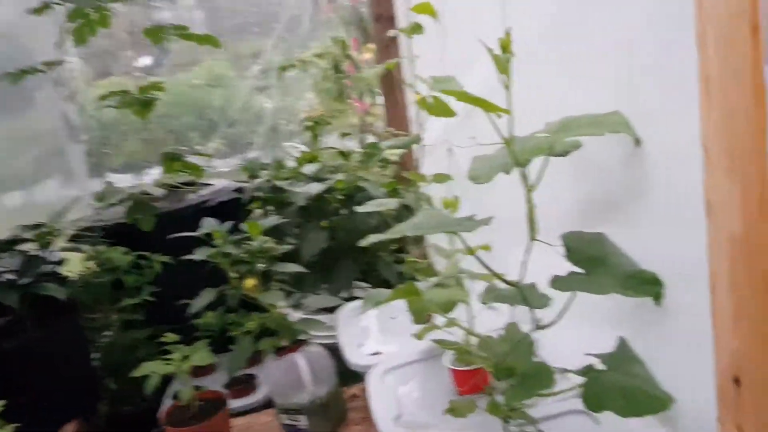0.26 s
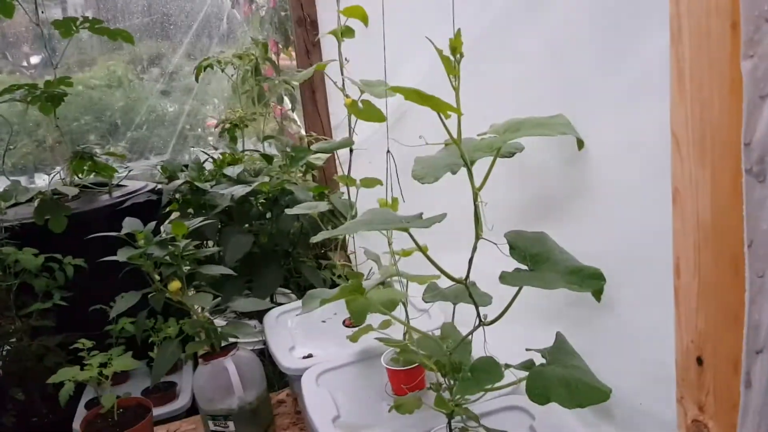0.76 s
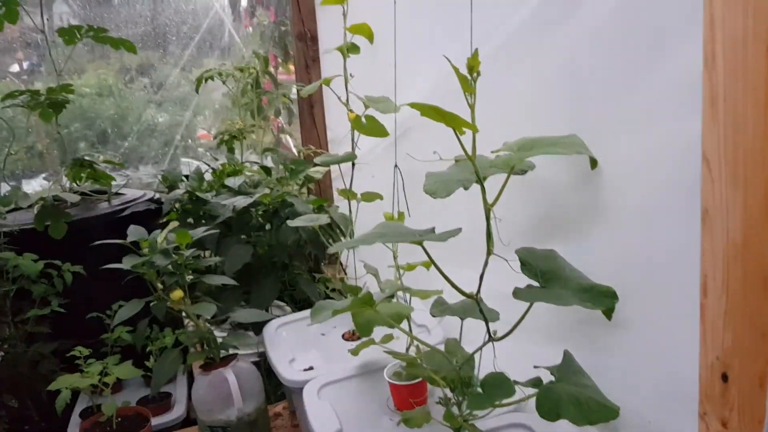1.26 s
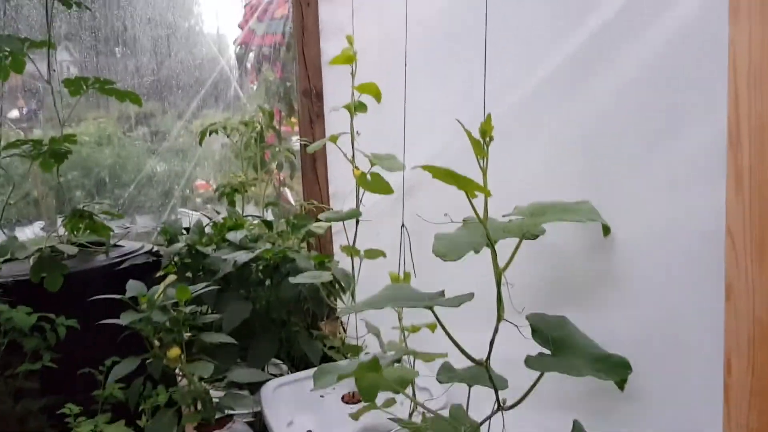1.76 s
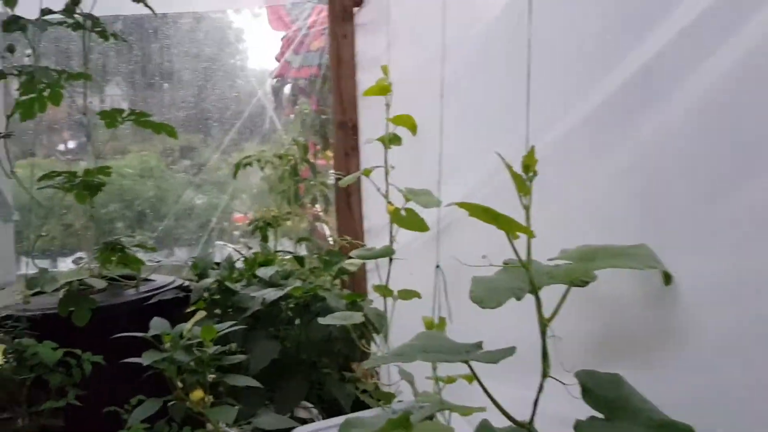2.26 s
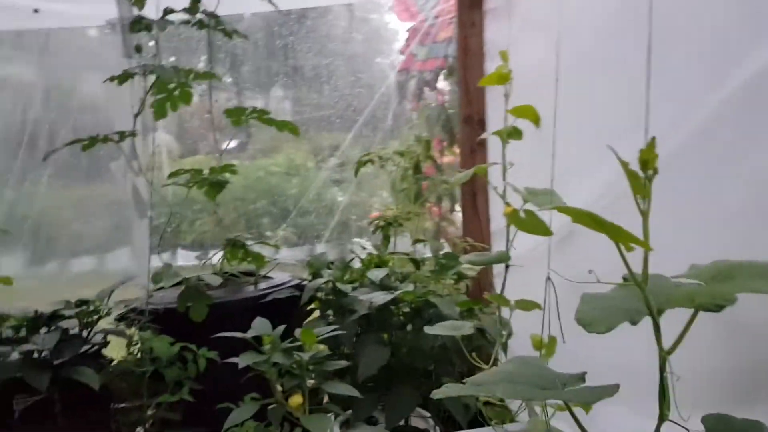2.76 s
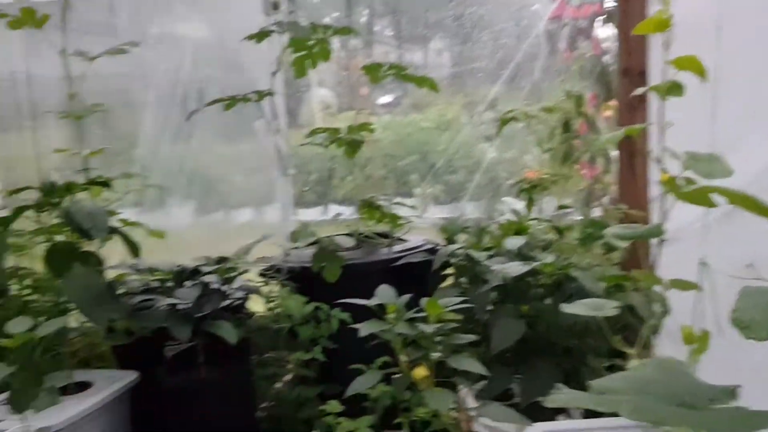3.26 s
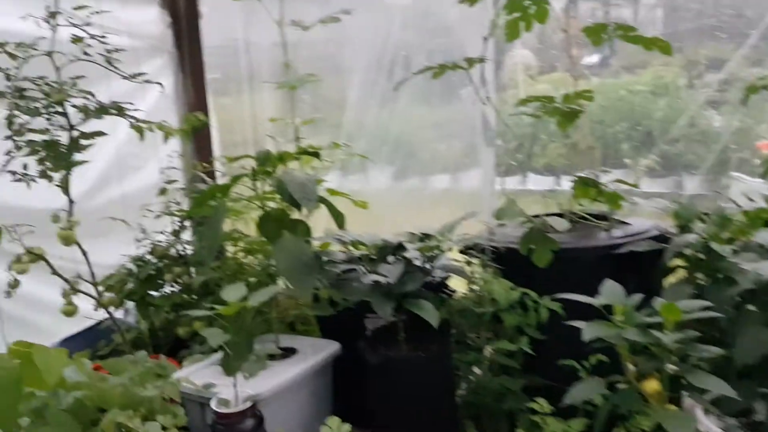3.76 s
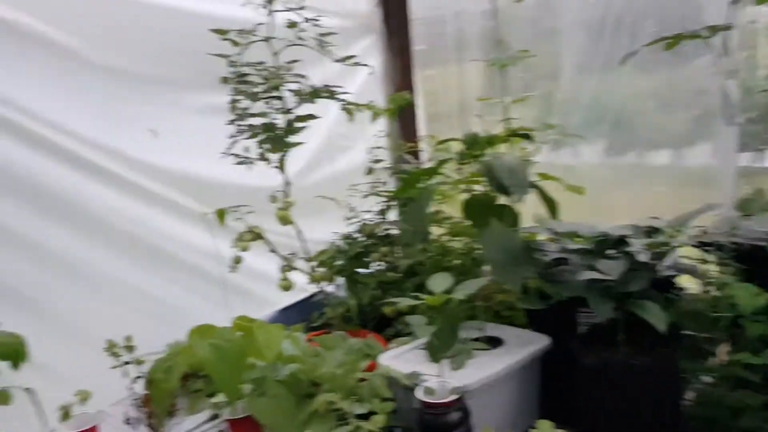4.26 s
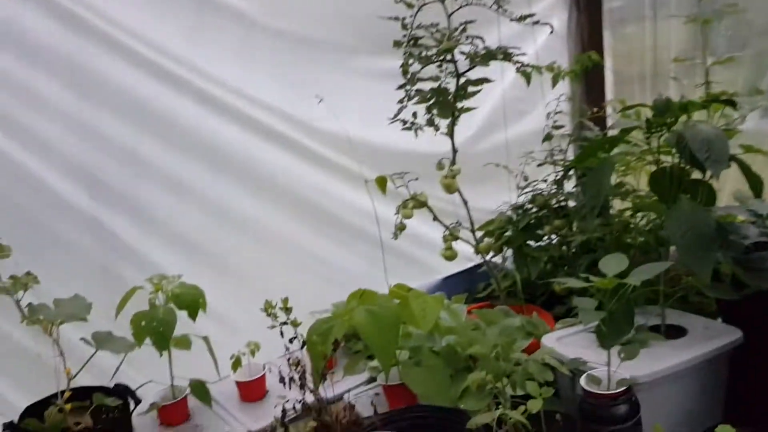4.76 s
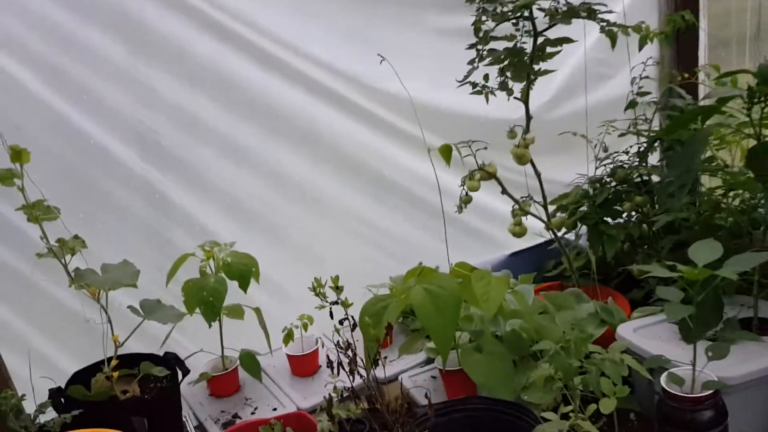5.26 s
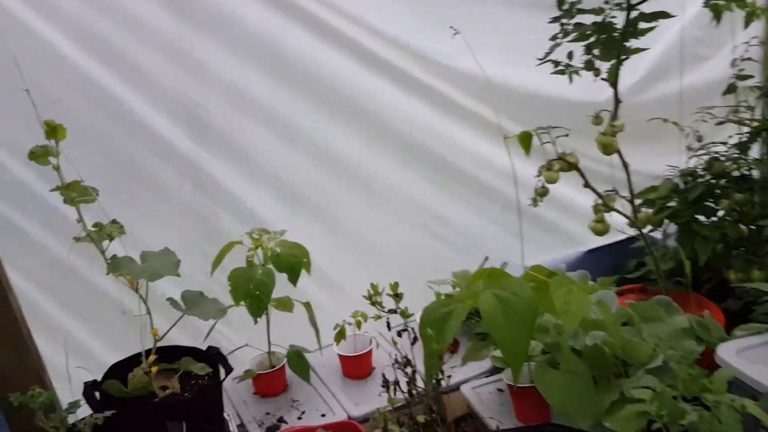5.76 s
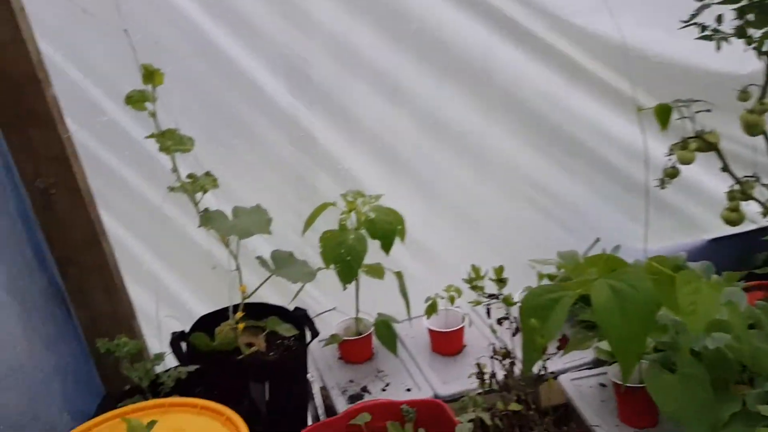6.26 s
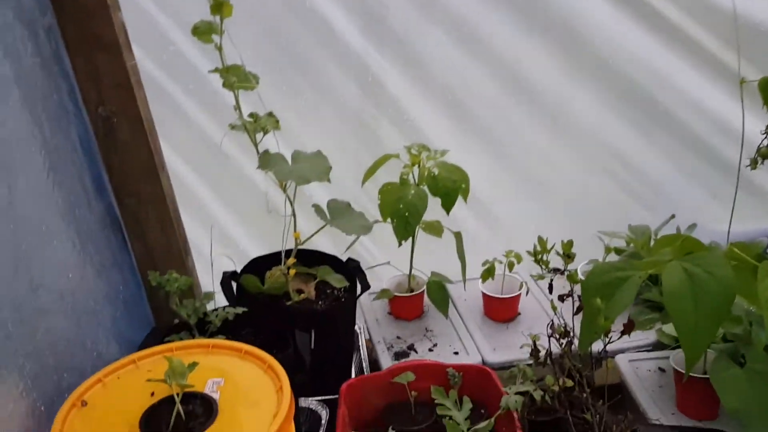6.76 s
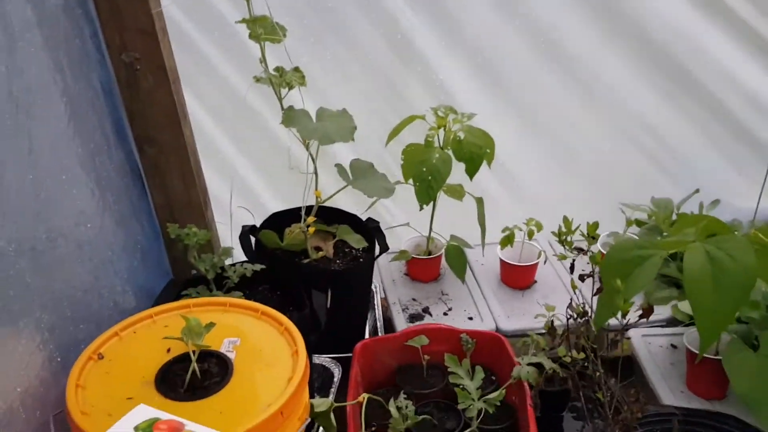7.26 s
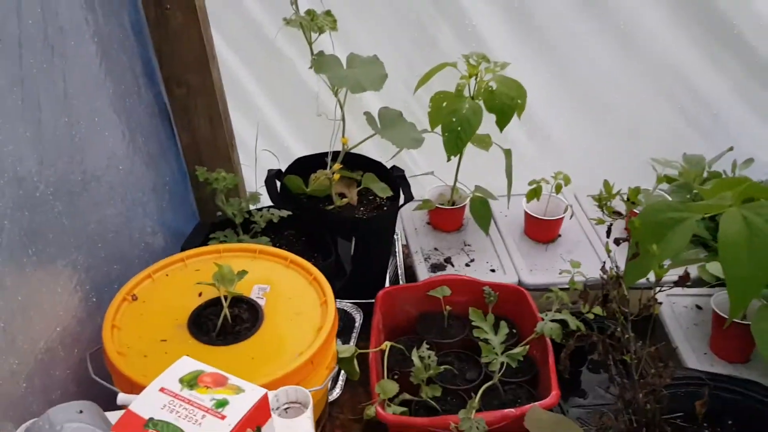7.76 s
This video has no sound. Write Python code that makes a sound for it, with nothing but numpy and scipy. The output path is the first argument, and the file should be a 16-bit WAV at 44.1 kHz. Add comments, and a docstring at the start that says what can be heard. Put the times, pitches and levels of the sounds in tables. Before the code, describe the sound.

For all eight seconds, fine rain hisses and patters on a small plastic greenhouse, heard from inside and slightly to the left, over a steady low outdoor rumble. Heavier drops snap irregularly on the sheeting, several a second, each ringing a panel at a different pitch and leaving a short grainy tail. Clear ones land at about 0.2, 1.4 and 2.1 seconds. The strongest fall between 3.5 and 4.1, with others near 5.4, 5.9 and 7.3.

From about 2.8 to 3.6 seconds the rain changes tone as the hand-held camera turns toward another wall. A sharp handling bump hits the microphone on the left at 2.9. From 3.1 to 4 seconds a finger creaks over the casing on the right in two strokes. Small close bumps follow on the right around 4.1 and 6.3, then cluster between 7.2 and 7.9 while the rain continues.

```python
"""Fine rain hisses on a small plastic greenhouse, heard from inside over a low outdoor rumble.
Heavy drops snap on the sheeting: a panel rings and the enclosure answers with a short grainy tail.
The rain changes colour as a hand-held camera turns left, from one wall to another.
A finger creaks in slips over the casing by the right microphone port and now and then bumps a port."""
import sys
import numpy as np
from scipy import signal
from scipy.fft import rfft, irfft, next_fast_len
from scipy.io import wavfile
from scipy.ndimage import uniform_filter1d, map_coordinates

SR = 44100
rng = np.random.default_rng(int(sys.argv[2]) if len(sys.argv) > 2 else 0)


def generate_wav(signal):
    """Clip the signal to [-1, 1] and save it as 16-bit WAV at the path in sys.argv[1]."""
    frames = np.transpose(np.atleast_2d(signal))
    scaled = np.clip(frames, -1, 1) * 32767
    pcm = np.round(scaled).astype(np.int16)
    wavfile.write(sys.argv[1], SR, pcm)


N = 352894

# Port balance facing the second wall. Each row: frequency in Hz, left over right in dB.
SECOND_WALL_BALANCE = [(60, 1.5), (110, 12), (200, 3), (380, 3), (700, 5.5), (1290, 3), (2380, 1),
                       (4400, 10), (8120, 8), (15000, -15.5)]
DROP_PAN_DB = np.array([[2.25], [-2.25]])  # drops are louder at the left port


def amp(db):
    return 10 ** (np.asarray(db) / 20)


def unit(x):
    return x / np.sqrt(np.mean(x ** 2) + 1e-20)


def along(points, hz):
    """Interpolate (Hz, value) points on a log axis."""
    knots_hz, values = np.transpose(points)
    return np.interp(np.log(hz + 1), np.log(knots_hz + 1), values)


def wobble(per_s):
    """A smooth random curve with per_s knots a second."""
    return map_coordinates(rng.standard_normal(int(N * per_s / SR) + 4), [np.arange(N) * per_s / SR])


def filtered(x, response):
    """Shape x by a complex function of frequency."""
    size = next_fast_len(N + SR // 2)
    return irfft(rfft(x, size) * response(np.fft.rfftfreq(size, 1 / SR)), size)[..., :N]


def modes(rows):
    """Resonances of alternating sign. Each row: centre in Hz, width in Hz, gain in dB."""
    return lambda f: sum((-1) ** k * amp(db) * 1j * f * width / (hz * hz - f * f + 1j * f * width)
                         for k, (hz, width, db) in enumerate(rows))


def high_pass(hz, damping):
    """Second-order causal high-pass response."""
    return lambda f: -f * f / (hz * hz - f * f + 1j * damping * f * hz)


def stereo(pair, spectrum, balance):
    """Colour, blend and pan two unrelated noises: narrow bass, wide treble, rms 1."""
    # Each row: frequency in Hz, correlation of left and right.
    likeness = [(60, 0.92), (300, 0.74), (700, 0.5), (1400, 0), (15000, 0)]
    angle = lambda hz: np.arccos(along(likeness, hz)) / 2
    mid, side = filtered(pair, lambda hz: amp(along(spectrum, hz)) * [np.cos(angle(hz)), np.sin(angle(hz))])
    pan = lambda hz: amp(np.outer([.5, -.5], along(balance, hz)))
    return unit(filtered(np.array([mid + side, mid - side]), pan))


def rumble():
    """A low steady roar from outside, wavering slightly."""
    # Each row: frequency in Hz, relative spectral level in dB.
    spectrum = [(20, -50), (35, -10), (52, 2.5), (120, 1), (220, -11), (400, -31)]
    level_db = -49.5 + 0.5 * wobble(per_s=3.14)
    return amp(level_db) * stereo(rng.standard_normal((2, N)), spectrum, balance=[(60, 2.0)])


def patter(per_s, spread_db, t60, smallest_db):
    """A gain that flares at each of many small random drops and falls back."""
    when, size = rng.random((int(per_s * N / SR), 2)).T
    drop_db = smallest_db - spread_db * np.log(1 - .985 * size)
    kicks = np.bincount((when * N).astype(int), amp(drop_db) ** 2, N)
    power_decay = amp(-2 * 60 * np.arange(SR // 8) / SR / t60)
    return np.sqrt(1 + np.abs(signal.fftconvolve(kicks, power_decay)[:N]))


def fine_rain():
    """Countless small drops on the sheeting, crossfading between two walls as the camera turns."""
    # Fader moves. Each row: time in seconds, then patter, hiss and air in dB before their trims.
    faders = [(0.0, -48.5, -57.5, -60.5), (0.2, -47.5, -59.5, -61.5), (0.87, -51.5, -60, -65.5),
              (1.54, -50, -60, -64.5), (2.65, -51.5, -60, -65), (3.34, -49.5, -52.5, -56.5),
              (3.63, -45.5, -55, -64), (3.99, -45.5, -53.5, -61), (4.36, -49.5, -55.5, -67),
              (4.61, -48.5, -55, -58), (4.77, -46, -53, -56.5), (5.5, -46, -53.5, -58),
              (5.95, -46.5, -51.5, -53), (6.17, -48, -54.5, -57), (7.0, -50, -53, -55.5),
              (7.31, -46, -51, -53.5), (7.8, -46.5, -51, -57), (8.0, -46.5, -50.5, -56)]
    # The tone of each wall. Each row: frequency in Hz, relative spectral level in dB.
    first_wall = [(120, -53), (200, -2.5), (441, -5), (674, -4), (1220, -4), (1930, -1.5), (2700, -6.5),
                  (4300, -14), (5810, -23), (12100, -19.5), (15100, -46), (16300, -37)]
    second_wall = [(120, -32), (200, 0), (361, -5.5), (857, -4), (2600, -3.5), (3300, -10.5), (6500, -16),
                   (8880, -26), (12600, -27), (15100, -49), (16300, -54)]
    # Port balance facing the first wall. Each row: frequency in Hz, left over right in dB.
    first_wall_balance = [(60, 1.0), (130, 6), (290, 3), (640, 7.5), (1410, 3), (3100, 1.5), (6820, 15),
                          (15000, -27)]
    turn_start_s, turn_length_s = 2.75, 0.89
    t = np.arange(N) / SR
    times, *levels = np.transpose(faders)
    patter_db, hiss_db, air_db = (np.interp(t, times, db) for db in levels)
    turned = np.clip((t - turn_start_s) / turn_length_s, 0, 1)
    flare = patter(per_s=90, spread_db=3.5, t60=0.12, smallest_db=-3.5)
    ticks = patter(per_s=60, spread_db=3, t60=0.011, smallest_db=-1.5)  # the finest drops, treble only
    thuds = patter(per_s=45, spread_db=5, t60=0.022, smallest_db=0.5)  # slack panels
    taps = patter(per_s=45, spread_db=5, t60=0.022, smallest_db=0.5)  # tight panels

    def wall(spectrum, balance):
        bed = stereo(unit(flare * rng.standard_normal((2, N))), spectrum, balance)
        treble = filtered(bed, lambda hz: 1 / (1 + (3200 / (hz + 1)) ** 6))
        body = bed - treble
        low = filtered(body, lambda hz: 1 / (1 + (hz / 1100) ** 4))
        pattering = low * thuds + (body - low) * taps
        sizzle = treble * ticks
        air = filtered(sizzle, lambda hz: 1 / (1 + (8300 / (hz + 1)) ** 12))
        return (amp(patter_db + 2) * unit(pattering) + amp(hiss_db + 2) * unit(sizzle - air)
                + amp(air_db + 1.5) * unit(air))
    return (np.sqrt(1 - turned) * wall(first_wall, first_wall_balance)
            + np.sqrt(turned) * wall(second_wall, SECOND_WALL_BALANCE))


def flurries():
    """Bunches of small drops on one panel: a soft swell of noise around its pitch, with no snap."""
    # Each row: middle in seconds, half length in seconds, level in dB, panel pitch in Hz.
    swells = [(1.822, 0.013, -44.5, 1000), (2.692, 0.015, -41, 970), (4.325, 0.015, -35.5, 1070),
              (5.435, 0.016, -52, 1500)]
    t, out = np.arange(N) / SR, 0
    for middle_s, half_s, db, hz in swells:
        noise = .7 * rng.standard_normal(N) + .7 * rng.standard_normal((2, N))
        swell = np.exp(-.5 * ((t - middle_s) / half_s) ** 2)
        out += amp(db) * swell * unit(filtered(noise, modes([(hz, 0.43 * hz, 0)])))
    return out * amp(DROP_PAN_DB)


def finger_on_casing():
    """Slips and bumps at a port: a spike as the skin lets go, then a pressure dip the vent evens out."""
    # Single bumps. Each row: time in seconds, dip in dB, width scale in ms, leading spike in dB,
    # port (0 left, 1 right).
    bumps = [(2.9155, -2, .2, -36, 0), (2.9174, -9, 0.17, -33, 0), (3.7818, -17.5, 0.77, -16, 1),
             (3.8091, -19, 0.94, -23, 1), (4.0816, -25, .9, -44, 1), (4.1232, -19, 0.65, -19, 1),
             (5.6025, -29, 0.83, -36, 1), (5.7399, -27, .9, -44, 1), (6.2512, -18.5, 0.38, -21, 1),
             (6.3729, -10.5, 0.16, -44, 1), (7.1571, -33, 0.88, -40, 1), (7.1958, -25, 0.62, -11.5, 1),
             (7.2095, -24, 0.61, -15, 1), (7.2519, -22, 0.54, -19, 1), (7.6404, -20.5, 1, -31, 1),
             (7.651, -22, 0.73, -10, 1), (7.6744, -24.5, 1, -40, 1), (7.8061, -26, 0.91, -17, 1),
             (7.8485, -17.5, 0.53, -22, 1)]
    # Two creaking strokes. Each row of a stroke: time in seconds, slips per second.
    strokes = [
        [(3.1127, 95.0), (3.17, 39.4), (3.23, 58.8), (3.33, 69.1), (3.385, 36.0), (3.44, 68.7), (3.5, 58.9),
         (3.56, 65.1), (3.61, 32.0), (3.645, 45.6), (3.685, 58.2), (3.72, 39.6)],
        [(3.8807, 41.5), (3.93, 70.8), (3.98, 83.0), (4.04, 34.4)],
    ]
    pulses, first_touch_s = list(bumps), strokes[0][0][0]
    for stroke in strokes:
        times, rates = np.transpose(stroke)
        t = np.arange(times[0], times[-1], 1 / SR)
        slip_count = np.cumsum(np.interp(t, times, rates)) / SR
        for when in np.interp(np.arange(int(slip_count[-1]) + 1), slip_count, t):
            size_jitter, width_jitter, spike_jitter = rng.standard_normal(3)
            grip_db = -12.5 * np.exp(-(when - first_touch_s) / .1)  # a light touch that firms up
            speed_db = 3 * np.log2(np.interp(when, times, rates) / 60)  # faster dragging slips harder
            db = -18.5 + grip_db + speed_db + 1.3 * size_jitter
            pulses.append((when, db, .95 * amp(.8 * width_jitter), db - 8 + 3 * spike_jitter, 1))
    pressure, ms = np.zeros((2, N)), np.arange(-300, 300) / SR * 1000
    for when, dip_db, width_ms, spike_db, port in pulses:
        slope_ms = width_ms * np.where(ms < 0, 0.23, 1.9)  # fast in, slow out
        dip = amp(dip_db) * np.exp(-.5 * (ms / slope_ms) ** 2)
        spike = amp(spike_db) * np.exp(-.5 * ((ms + 1.48 * width_ms) / 0.15) ** 2)
        pressure[round(port), round(when * SR) - 300:][:600] += spike - dip
    return filtered(pressure, high_pass(62, damping=1))


def heavy_drops():
    """Each drop pushes the film in with a snap, rings its panel and leaves a tail of scattered returns."""
    # Each row: start in seconds, snap in dB, panel pitch in Hz, tail in dB,
    # then treble and note in dB relative to the tail. All levels are set ahead of the filters.
    hits = [(0.242, -14.5, 295, -40.5, -8, 9.5), (0.329, -32, 886, -40, -15, 3),
            (0.395, -28, 670, -52, -19, 1), (0.678, -19, 600, -43.5, -35, 16),
            (0.748, -38, 298, -47, -27, 5), (0.801, -31, 820, -41.5, -21, 5),
            (0.827, -22.5, 925, -53, -14, -2), (1.244, -41, 776, -41, -20, 0),
            (1.315, -43, 298, -46.5, -25, -1), (1.36, -10, 796, -27.5, -22, 7),
            (1.513, -28, 883, -36, -20, 4), (1.612, -33, 1890, -53, -28, 3),
            (1.842, -27, 1300, -39.5, -21, 6), (1.854, -33, 1780, -42.5, -29, 0),
            (2.142, -14, 750, -27.5, -25, 5.5), (2.18, -16, 885, -35.5, -24, 3),
            (2.493, -43, 1260, -43.5, -34, 14), (2.821, -23, 583, -38, -11.5, -1),
            (2.845, -29, 794, -38.5, -24, 2), (3.134, -39, 848, -35.5, -11, 4),
            (3.153, -20, 860, -42, -22, 7), (3.248, -13, 318, -33.5, -7, -7),
            (3.393, -28, 1800, -32, -4, 8), (3.571, -3, 614, -33, -9, -7), (3.764, -7.5, 426, -29, -15, -1),
            (3.83, -18, 1120, -33, -28, 4), (3.98, -6, 800, -24.5, -12.5, 3.5),
            (4.096, -7, 755, -26.5, -10.5, 3.5), (4.241, -26, 934, -34, -8, 0),
            (4.642, -22, 397, -25.5, -12, 4.5), (4.694, -20, 342, -27, -18, 0.5),
            (4.741, -39, 2750, -44, -15, 3), (4.967, -32, 2510, -40, -16, 1),
            (4.997, -19, 1270, -33, -10.5, 3), (5.036, -26, 750, -41.5, -11, 3),
            (5.115, -32, 2370, -44.5, 7.5, 5), (5.232, -14, 725, -25, -19, -1.5),
            (5.331, -21, 2610, -31, -17, -4), (5.364, -6.5, 1040, -25, -17, -6),
            (5.421, -40, 2610, -36, -16, 5), (5.463, -39, 1100, -47, -6, 3), (5.754, -28, 694, -38, -20, 6),
            (5.877, -10.5, 332, -31.5, -8, 6.5), (5.988, -27, 931, -38, -7.5, 3),
            (6.433, -34, 1870, -39.5, -29, 10), (6.565, -39, 2480, -36.5, -8.5, -2),
            (6.76, -23, 692, -34, -13, -3), (6.827, -37, 468, -44.5, -19, 1),
            (6.859, -39, 853, -46, -10, -1), (6.895, -37, 953, -51, -14, 3), (6.921, -32, 614, -51, -12, 3),
            (7.05, -37, 397, -32, -14, -3), (7.092, -19, 1010, -36, -8.5, 1),
            (7.11, -31, 2180, -43, -16, 3), (7.32, -11.5, 895, -28, -25, -1),
            (7.378, -32, 2280, -34, -27, 3), (7.4, -16, 680, -35.5, -25, 1),
            (7.456, -33, 2310, -46, -20, 3), (7.528, -29, 1190, -32, -13.5, -1),
            (7.553, -28, 1590, -33.5, -29, 6), (7.573, -30, 690, -44, 3.5, 1),
            (7.892, -26, 625, -33.5, -9, 6), (7.935, -35, 1120, -38, -23, -1)]
    # Resonances of the struck film, low to high. Each row: centre in Hz, width in Hz, gain in dB.
    film_modes = [(236, 410, 3.5), (854, 790, 0), (2480, 1580, -1.5), (5350, 9800, -2), (13000, 1700, -4.5)]
    peak_after_s, right_lag_s, ring_cycles = .0015, .0002, 20.7  # cycles for the note to fall 60 dB
    snap, note, bass, body, treble = np.zeros((5, 2, N + SR))
    t, pan = np.arange(SR // 7) / SR, amp(DROP_PAN_DB)
    decay = lambda db, t60: amp(db - 60 * t / t60)
    for start_s, snap_db, hz, tail_db, treble_db, note_db in hits:
        peak = round((start_s + peak_after_s) * SR)
        width_s = 0.00016 * (700 / hz) ** 0.2  # small tight panels give a narrower push
        push = np.exp(-.5 * ((t - 30 / SR) / width_s) ** 2)
        snap[:, peak - 30:][:, :len(t)] += 0.95 * pan * amp(snap_db) * push
        ring = decay(tail_db + note_db, ring_cycles / hz) * np.sin(2 * np.pi * hz * t)
        note[:, peak:][:, :len(t)] += pan * ring
        scatter = .6 * rng.standard_normal((3, 1, len(t))) + .78 * rng.standard_normal((3, 2, len(t)))
        grain = amp(3 * unit(uniform_filter1d(rng.standard_normal(len(t)), size=40)))  # separate returns
        low, mid, high = pan * amp(tail_db) * grain * scatter
        boom_db = 6.5 - 7 * np.log2(hz / 700)  # lower panels boom more
        bass[:, peak:][:, :len(t)] += low * decay(boom_db, 0.1)
        body[:, peak:][:, :len(t)] += mid * (decay(8.5, 0.081) + decay(-5.5, 0.12))
        treble[:, peak - 8:][:, :len(t)] += high * amp(treble_db) * (decay(12.5, 0.0053) + decay(3.5, 0.18))

    def resonate(x, rows, low_cut_hz):
        return filtered(filtered(x[:, :N], modes(rows)), high_pass(low_cut_hz, damping=1.25))
    treble_pan = lambda hz: amp(np.outer([.5, -.5], along(SECOND_WALL_BALANCE, hz) - 3.5))
    tail = resonate(bass, film_modes[:1], 80) + resonate(body, film_modes[1:3], 460)
    tail += filtered(resonate(treble, film_modes[3:], 2200), treble_pan)
    snap = filtered(snap[:, :N], high_pass(220, damping=3.3))  # the film springs back
    right_delay = lambda hz: np.exp(np.outer([0, -2j * np.pi * right_lag_s], hz))
    return filtered(snap + note[:, :N] + tail, right_delay)


def treble_hollow(x):
    """A scoop in the treble that shifts as the camera turns."""
    # Each row: time in seconds, centre in Hz, depth in dB.
    sweep = [(0, 8500, 0), (3.1, 8700, 0.5), (3.6, 7360, 9.5), (4.3, 8550, 9), (5.2, 9100, 4.5),
             (6.2, 8550, 4.5), (7.0, 8200, 6.5), (7.5, 7300, 11.5), (8, 7500, 11)]
    width_hz = 960
    hz, t, spectra = signal.stft(x, SR, nperseg=512)
    times, centre_hz, depth_db = np.transpose(sweep)
    bell = np.exp(-.5 * ((hz[:, None] - np.interp(t, times, centre_hz)) / width_hz) ** 2)
    gain = amp(-np.interp(t, times, depth_db) * bell)
    return signal.istft(spectra * gain, SR, nperseg=512)[1][:, :N]


def scene():
    return treble_hollow(fine_rain() + heavy_drops()) + rumble() + flurries() + finger_on_casing()


def record(dry):
    """The camera keeps nothing above its band limit."""
    return filtered(dry, lambda hz: hz < 15900)


dry = scene()
out = record(dry)
generate_wav(out)
```